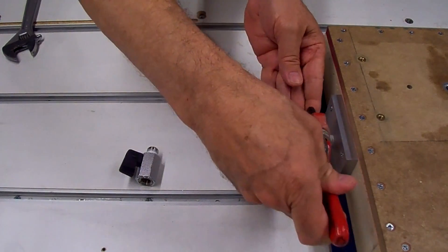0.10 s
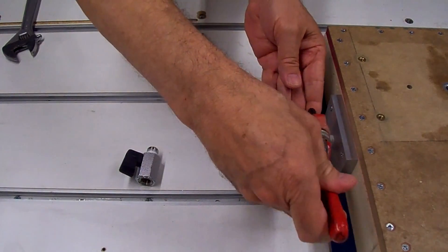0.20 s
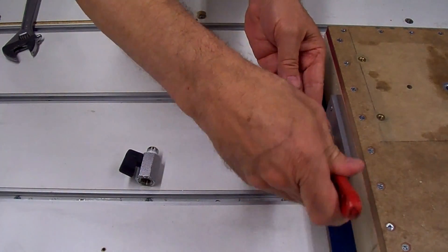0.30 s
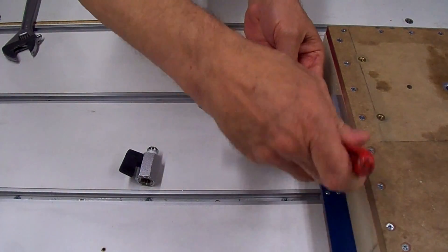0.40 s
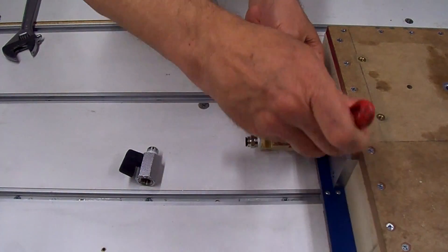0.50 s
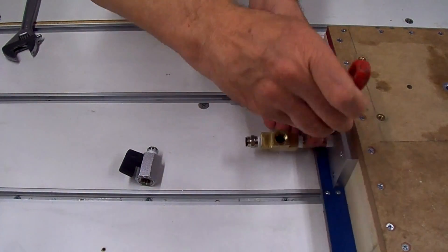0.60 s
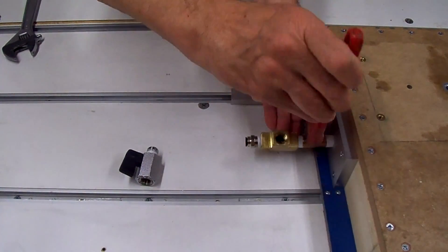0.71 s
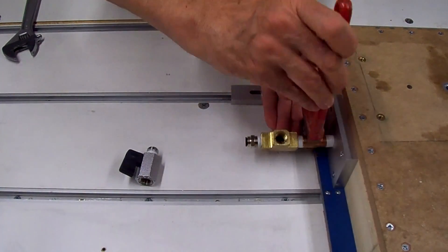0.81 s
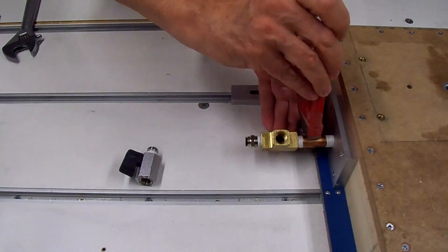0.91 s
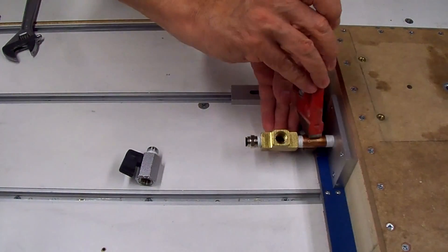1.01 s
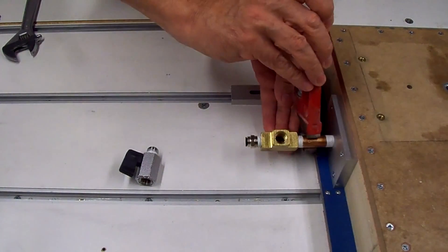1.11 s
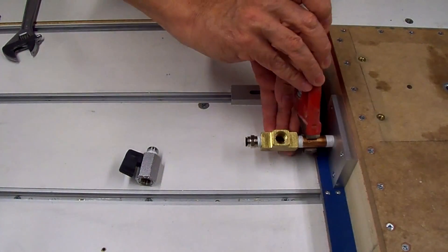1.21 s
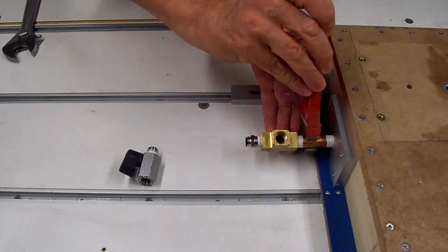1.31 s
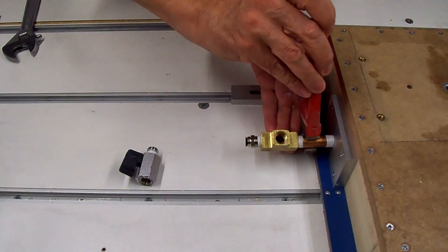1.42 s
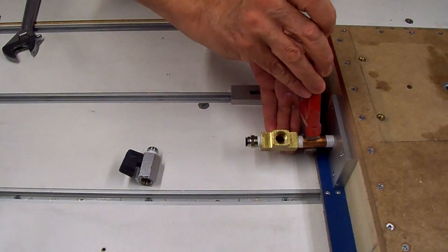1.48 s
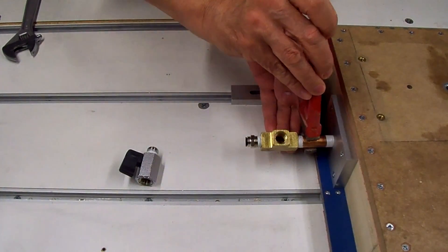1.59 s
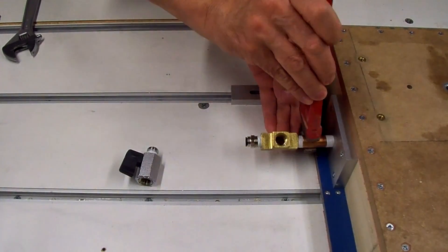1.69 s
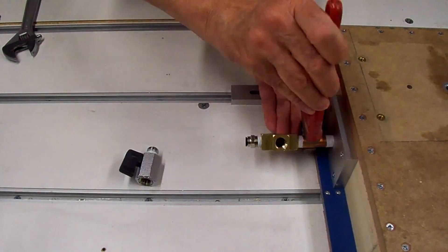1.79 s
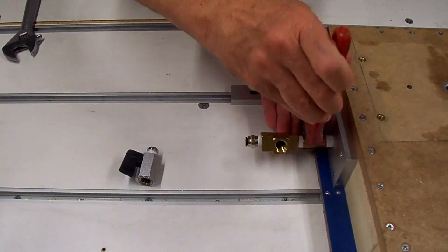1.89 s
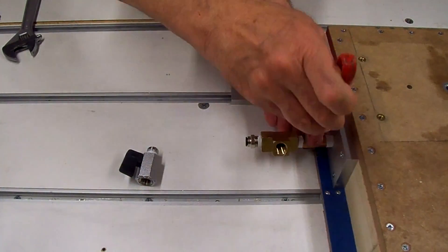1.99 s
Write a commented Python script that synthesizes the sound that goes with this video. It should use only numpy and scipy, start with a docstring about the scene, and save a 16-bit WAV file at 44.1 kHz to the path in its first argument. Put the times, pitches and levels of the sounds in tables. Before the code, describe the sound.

Wrench clacks on a brass fitting, heard close in a small workshop. Faint rumble and hiss, then a short scrape into the loudest clack at 0.2 s, with a steel ping and hollow bench thud. A lesser clack at 0.35, soft knocks and low bench grumble from 0.5 to 0.95, a bright tick at 1.04, strong paired clacks around 1.2, crisp clicks near 1.33, then almost quiet to 2 s.

```python
"""In a quiet workshop, a hand works a wrench on a brass fitting screwed to a plate at a hollow bench's edge.
The jaws scrape and clack on the fitting, the steel wrench pings, the plate knocks and the bench top thuds.
Each contact is a short noisy force driving the damped modes of one body; hands loading the bench make it
grumble as steady noise through its modes. Air rumble and hiss are shaped noise, and a short room is convolved
with the contacts above the bench."""
import sys
import numpy as np
from scipy import signal
from scipy.fft import rfft, irfft, next_fast_len
from scipy.io import wavfile
from scipy.ndimage import uniform_filter1d, map_coordinates

SR = 44100
rng = np.random.default_rng(int(sys.argv[2]) if len(sys.argv) > 2 else 0)


def int16_out(signal):
    """Quantize to a 16-bit WAV file."""
    q = np.round(np.clip(np.atleast_2d(signal).T, -1, 1) * 32767)
    wavfile.write(sys.argv[1], SR, q.astype(np.int16))


def boost(x):
    """Linear amplitude factor 10**(x/20) for a level x in decibels (scalar or array-like)."""
    u = np.asarray(x, float) / 20
    return 10 ** u


N = 88200  # samples: two seconds
BAND_LIMIT_HZ = 14150  # the hiss stops here, and the contacts step down above it

# Modes of the brass fitting: (frequency [Hz], relative strength [dB], t60 [s])
FITTING_MODES = [(1418, 16, 0.022), (1635, 9, 0.021), (2000, 7.5, 0.022), (2200, -4, 0.096),
                 (2400, 9, 0.017), (2650, 7.5, 0.02), (3120, 18, 0.0086), (3457, 13, 0.017),
                 (3555, 13.5, 0.011), (3840, 11.5, 0.012), (4014, 6.5, 0.019)]
# Modes of the steel wrench: (frequency [Hz], relative strength [dB], t60 [s])
WRENCH_MODES = [(4900, 3, 0.028), (5800, -24, 0.013), (7620, 6.5, 0.0084), (9040, 6.5, 0.019),
                (9550, 1, 0.033), (10780, 6.5, 0.0099), (11220, 1, 0.036), (12000, 8, 0.018),
                (12360, 6, 0.031), (13700, -10, 0.013)]
# Modes of the hollow bench top: (frequency [Hz], relative strength [dB], t60 [s])
BENCH_MODES = [(88, 5, 0.019), (113.3, -12, 0.4), (167, 0.5, 0.3), (223.2, -9.5, 0.29), (245, 1.5, 0.054),
               (333.3, 0, 0.163), (398.8, -2.5, 0.24)]


def along(points, hz):
    """Interpolation of (frequency, value) points on a logarithmic frequency axis."""
    f, v = np.transpose(points)
    return np.interp(np.log(hz + 1), np.log(f + 1), v)


def unit(x):
    """Normalisation to an rms of 1."""
    return x / np.sqrt(np.mean(x ** 2) + 1e-20)


def filtered(x, response):
    """Linear filtering: the spectrum times a complex frequency response, zero-padded for the tail."""
    m = next_fast_len(len(x) + SR // 2)
    spectrum = rfft(x, m) * response(np.fft.rfftfreq(m, 1 / SR))
    return irfft(spectrum, m)[:len(x)]


def dull(x, top_hz, order):
    """Causal Butterworth low-pass: treble falls away above top_hz."""
    return signal.sosfilt(signal.butter(N=order, Wn=top_hz, fs=SR, output="sos"), x)


def body(modes, gains):
    """Modal superposition: a body responds as a sum of damped resonances of alternating sign."""
    def response(f):
        """Sum of second-order resonances, each as wide as its t60 demands."""
        total = 0
        for k, ((hz, db, t60), gain) in enumerate(zip(modes, gains)):
            width_hz = np.log(1000) / np.pi / t60
            resonance = 1j * f / (hz * hz - f * f + 1j * f * width_hz)
            total = total + (-1) ** k * gain * boost(db) * resonance
        return total
    return response


def ringing(force, modes, favoured_hz, octaves, crack_db):
    """Selective excitation: modes near the favoured pitch ring most, with one broad, heavily damped crack."""
    scatter_db = 2  # mode strengths differ from blow to blow
    hz = np.array([m[0] for m in modes])
    power = uniform_filter1d(np.abs(rfft(force)) ** 2, size=13)
    at_modes = power[np.round(hz * len(force) / SR).astype(int)]
    reach = np.clip(np.sqrt(power.mean() / at_modes), 0.5, 2)  # evens out the random force spectrum
    nearness = 1 / (1 + (np.log2(hz / favoured_hz) / octaves) ** 2)
    gains = reach * boost(scatter_db * rng.standard_normal(len(hz))) * nearness
    crack_t60 = np.log(1000) / np.pi / (octaves * favoured_hz)
    crack = (favoured_hz, crack_db, crack_t60)
    return filtered(force, body([*modes, crack], [*gains, 1]))


def blows(events, modes, crack_db, blow_db, attack_s, rattle_db, rattle_s):
    """Impact excitation: a sharp blow, a noisy chatter of force and a loose rattle drive the modes."""
    out, t = np.zeros(N + SR), np.arange(SR // 2) / SR
    for start_s, db, favoured_hz, octaves, length_s in events:
        onset = 1 - np.exp(-t / attack_s)
        decay = np.exp(-t / length_s) + boost(rattle_db) * np.exp(-t / rattle_s)
        force = rng.standard_normal(len(t)) * onset * decay
        force[round(attack_s * SR)] = boost(blow_db) * np.linalg.norm(force)
        ring = ringing(force, modes, favoured_hz, octaves, crack_db)
        power = uniform_filter1d(ring ** 2, size=300)
        # the level is set by the loudest 300-sample mean power
        out[round(start_s * SR):][:len(t)] += boost(db) * ring / np.sqrt(2 * power.max())
    return out[:N]


def air():
    """Stationary noise: random pressure coloured into a steady rumble and hiss."""
    # Colour of the floor: (frequency [Hz], relative density [dB per Hz])
    air_colour = [(12, -56), (20, 0.5), (125, -6), (160, -2.5), (194, -6.5), (234, -8.5), (518, -13.5),
                  (611, -19), (681, -16), (760, -19), (13800, -32.5)]

    def colour(hz):
        """Spectral density, held constant from 13 kHz and zero from the band limit up."""
        return boost(along(air_colour, np.minimum(hz, 13000))) * (hz < BAND_LIMIT_HZ)
    return boost(-42) * unit(filtered(rng.standard_normal(N), colour))


def room(x):
    """Reverberation: convolution with noise whose every frequency dies at its own speed."""
    # Decay of the workshop: (frequency [Hz], t60 [s])
    room_decay = [(200, 0.11), (1000, 0.36), (4000, 0.15), (12000, 0.16)]
    out, step = np.zeros(N + 2 * SR), SR // 20
    # a fresh random tail every 50 ms keeps the reverberation evenly coloured
    for start in range(0, N, step):
        hz, t, z = signal.stft(rng.standard_normal(SR // 3), SR, nperseg=256)
        decay = boost(-60 * t / along(room_decay, hz)[:, None])
        tail = signal.istft(z * decay, SR, nperseg=256)[1]
        wet = signal.fftconvolve(x[start:start + step], tail / np.linalg.norm(tail))
        out[start + 200:][:len(wet)] += wet  # arrives 200 samples late
    return out[:N]


def strain():
    """Forced vibration: hands push and shift on the work, so the bench modes grumble in lumps."""
    # Hands loading the bench, before the lumps: (time [s], level [dB])
    hand_load = [(0.0, -58.5), (0.21, -36.5), (0.4, -37), (0.46, -38.5), (0.75, -43), (0.98, -47.5),
                 (1.2, -50.5), (1.36, -64), (2.0, -96)]
    lumps_db, lumps_hz = 2.5, 25
    s, db = np.transpose(hand_load)
    lumps = map_coordinates(rng.standard_normal(64), [np.arange(N) * lumps_hz / SR])
    grumble = unit(filtered(rng.standard_normal(N), body(BENCH_MODES, np.ones(len(BENCH_MODES)))))
    return grumble * boost(np.interp(np.arange(N) / SR, s, db) + lumps_db * lumps)


def thuds():
    """Low modal response: soft pushes ring the bench top and put little treble into it."""
    # Thuds, levels before the low-pass:
    # (time [s], level [dB], favoured pitch [Hz], spread [octaves], push length [s])
    thud_events = [(.209, -14, 250, 1.2, 0.0062), (.353, -21.5, 168, 0.61, 0.012),
                   (.492, -26.5, 164, 0.2, 0.072), (.613, -25, 163, 0.85, 0.0077),
                   (.632, -26, 165, 0.25, 0.012), (.762, -44, 171, 0.5, 0.0054),
                   (.787, -32.5, 191, 0.49, .012), (.864, -27, 161, 0.51, 0.02),
                   (.929, -32.5, 407, 0.31, 0.0033), (.995, -43, 167, 0.91, 0.011),
                   (1.037, -28.5, 292, 0.72, 0.013), (1.159, -26, 166, 0.68, 0.0086),
                   (1.192, -17.5, 285, 0.97, 0.0046), (1.206, -18, 238, 0.96, 0.0021),
                   (1.218, -31, 257, 0.23, 0.0035), (1.234, -22, 337, 0.33, 0.0068),
                   (1.329, -31, 242, 1, 0.0078), (1.353, -36.5, 393, 0.77, 0.005),
                   (1.437, -38.5, 109, 0.24, 0.0042), (1.659, -46, 167, 0.22, 0.0048)]
    thud = blows(thud_events, BENCH_MODES, crack_db=1.5, blow_db=4, attack_s=0.0016,
                 rattle_db=9, rattle_s=0.007)
    return dull(thud, 700, order=2)


def knocks():
    """Plate vibration: soft contacts ring the metal plate and put little treble into it."""
    # Knocks, levels before the low-pass:
    # (time [s], level [dB], favoured pitch [Hz], spread [octaves], chatter length [s])
    knock_events = [(.169, -38, 1000, 0.65, 0.0065), (.2068, -16.5, 765, 0.16, 0.0081),
                    (.347, -27, 840, 0.48, 0.018), (.504, -34.5, 890, 0.081, 0.0016),
                    (.578, -42.5, 1060, 0.54, .006), (.611, -29.5, 700, 0.77, 0.0046),
                    (.622, -35, 1005, 0.12, 0.017), (.657, -33, 670, 0.35, 0.0049),
                    (.868, -40, 656, 0.25, 0.0027), (.921, -45, 980, 0.24, 0.0035),
                    (1.038, -45.5, 930, 0.5, 0.0032), (1.159, -39, 1030, 0.42, 0.034),
                    (1.194, -29, 570, 0.78, 0.013), (1.226, -25, 780, 1.1, 0.0081),
                    (1.249, -36.5, 600, 0.31, 0.0027), (1.326, -35, 960, 0.43, 0.0047),
                    (1.351, -42, 940, 0.83, 0.0016)]
    # Modes of the metal plate: (frequency [Hz], relative strength [dB], t60 [s])
    plate_modes = [(522, 0.5, 0.066), (650, -3.5, 0.059), (765, 3.5, 0.038), (864, -5.5, 0.034),
                   (920, -3.5, 0.11), (998, -2, 0.074), (1133, -2.5, 0.039)]
    knock = blows(knock_events, plate_modes, crack_db=5, blow_db=-1.5, attack_s=0.0008,
                  rattle_db=-3.5, rattle_s=0.023)
    return dull(knock, 1600, order=2)


def pings():
    """High modal response: brief blows ring the stiff steel wrench."""
    # Pings: (time [s], level [dB], favoured pitch [Hz], spread [octaves], chatter length [s])
    ping_events = [(.2066, -16, 12050, 0.35, 0.00059), (.2062, -21, 4900, 0.13, 0.0011),
                   (.3456, -33.5, 7800, 0.48, 0.0044), (.610, -43, 11100, 0.44, .003),
                   (.655, -43, 13700, .08, .004), (.768, -44.5, 12500, .3, 0.0033),
                   (1.0370, -25, 11500, 0.077, 0.0017), (1.159, -39.5, 8950, 0.21, 0.0024),
                   (1.18, -42, 12100, 0.09, .012), (1.192, -39, 9000, 0.78, 0.0021),
                   (1.3507, -39.5, 4900, 0.059, 0.0023)]
    return blows(ping_events, WRENCH_MODES, crack_db=26.5, blow_db=-9.0, attack_s=0.0004,
                 rattle_db=-35, rattle_s=0.0091)


def slide():
    """Friction noise: the jaw slides along the fitting before it bites, a scrape of steel on brass."""
    start_s, end_s, rise_db, octaves = 0.182, 0.204, 13, 0.97
    u = (np.arange(N) / SR - start_s) / (end_s - start_s)
    swell = ((u > 0) & (u < 1)) * boost(rise_db * (np.clip(u, 0, 1) - 1))
    scrape = 0
    # favoured pitch in Hz and level in dB at the end of the swell
    for modes, favoured_hz, db in ((FITTING_MODES, 3550, -25.5), (WRENCH_MODES, 12000, -43)):
        near = [1 / (1 + (np.log2(m[0] / favoured_hz) / octaves) ** 2) for m in modes]
        scrape = scrape + boost(db) * unit(filtered(rng.standard_normal(N), body(modes, near)))
    return swell * scrape


def clacks():
    """Damped modal response: the jaws clack and chatter on the gripped fitting, which is dead in the treble."""
    # Clacks, levels before the notch and low-pass:
    # (time [s], level [dB], favoured pitch [Hz], spread [octaves], chatter length [s])
    clack_events = [(.1693, -25.5, 2600, 2.1, 0.0071), (.2064, -12, 2200, 0.78, 0.0069),
                    (.3455, -24, 2490, 0.27, 0.0077), (.5066, -30, 2400, 0.18, 0.0053),
                    (.5805, -36, 3680, 0.56, 0.00098), (.6104, -25, 2600, 0.3, 0.0086),
                    (.644, -35.5, 2330, 0.42, 0.013), (.881, -39.5, 2400, 1.5, 0.0027),
                    (.893, -45.5, 1430, 0.11, .003), (.926, -43.5, 3180, 0.18, 0.0031),
                    (1.0372, -27.5, 3040, 1.3, 0.0041), (1.1595, -33, 3200, 0.49, 0.036),
                    (1.1931, -15.5, 2480, 0.35, 0.0024), (1.2251, -19.5, 2390, 1, 0.0026),
                    (1.316, -36, 3500, .3, 0.0021), (1.3265, -24, 2000, 1, 0.0019),
                    (1.338, -31, 1600, 0.33, 0.002), (1.3506, -21.5, 3300, 1.3, 0.001),
                    (1.3615, -39, 1600, 0.2, 0.0019)]
    clack = blows(clack_events, FITTING_MODES, crack_db=-6, blow_db=-2.5, attack_s=0.0004,
                  rattle_db=-31.5, rattle_s=0.018)
    # the fitting barely radiates in this gap between two modes
    deaf_hz, deaf_width_hz = 3033, 320
    clack = signal.lfilter(*signal.iirnotch(deaf_hz, deaf_hz / deaf_width_hz, SR), clack)
    return dull(clack, 4270, order=8)


def scene():
    """Linear superposition of the contacts, their room, the bench and the air."""
    work = slide() + clacks() + knocks() + pings()
    bench = thuds() + strain()  # kept dry, so the low ring of the bench stays clear
    room_db = -9
    wet = boost(room_db) * room(work)
    return (work + wet + bench + air())[None]


def low_pass(x):
    """Removes everything above the highest recorded frequency."""
    return signal.sosfilt(signal.butter(12, 15320, fs=SR, output="sos"), x)


def record(dry):
    """Band limiting: everything above the band limit steps down by 22 dB."""
    heard = filtered(dry[0], lambda hz: np.where(hz < BAND_LIMIT_HZ, 1, boost(-22)))
    return low_pass(heard[None])


dry = scene()
out = record(dry)
int16_out(out)
```